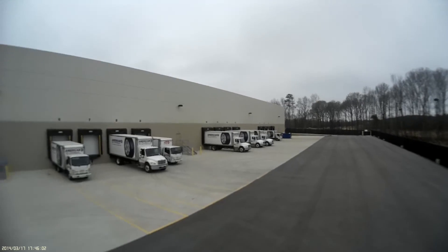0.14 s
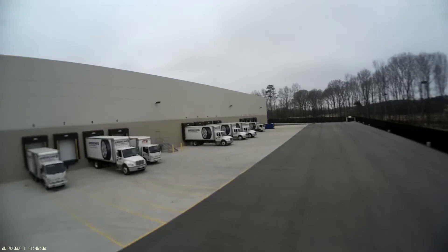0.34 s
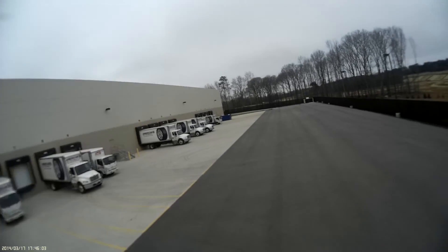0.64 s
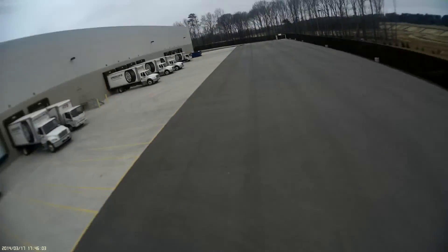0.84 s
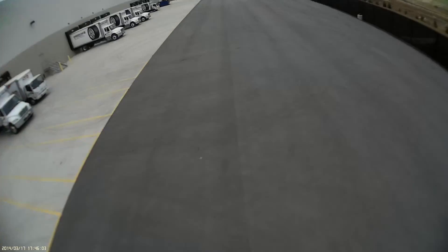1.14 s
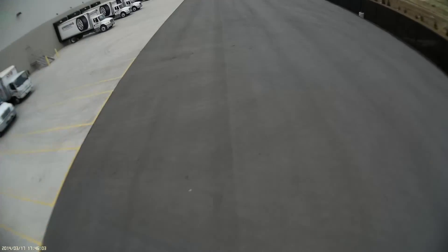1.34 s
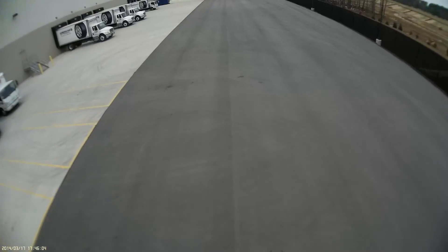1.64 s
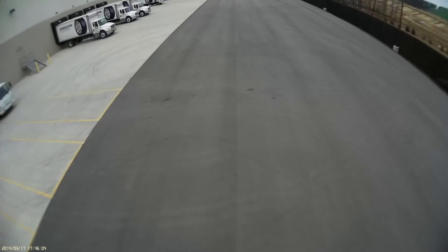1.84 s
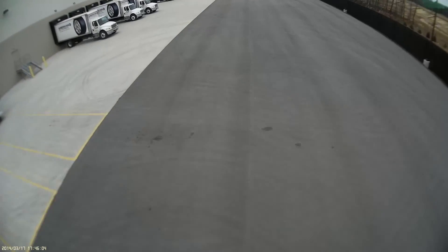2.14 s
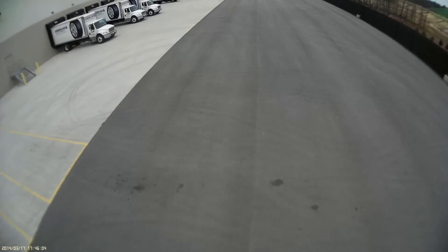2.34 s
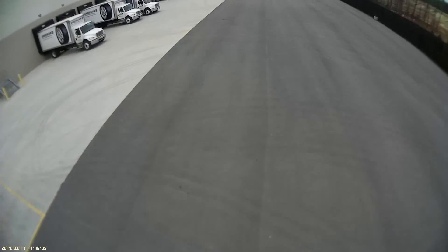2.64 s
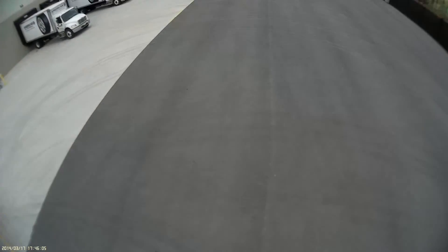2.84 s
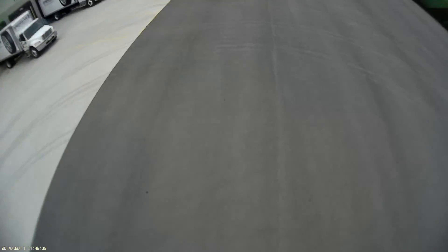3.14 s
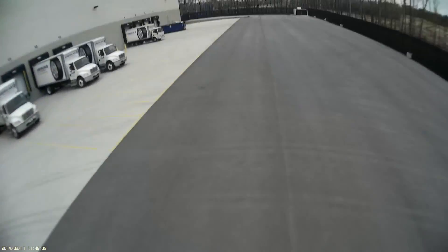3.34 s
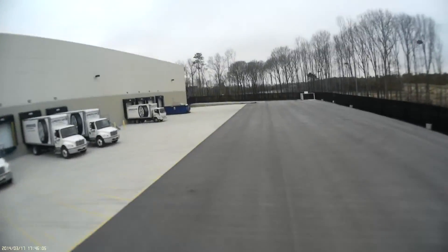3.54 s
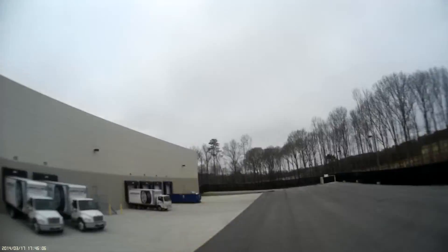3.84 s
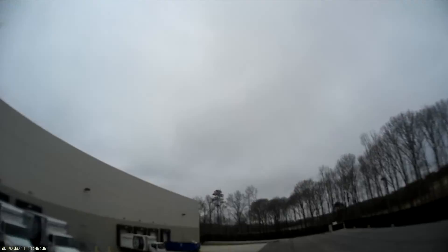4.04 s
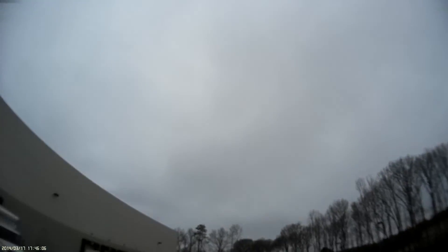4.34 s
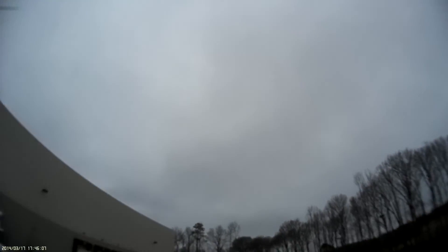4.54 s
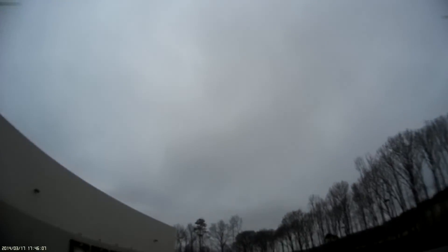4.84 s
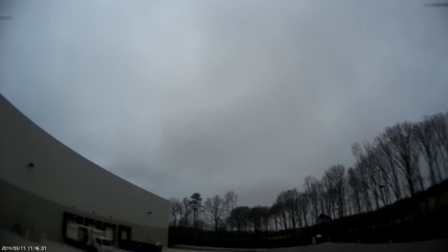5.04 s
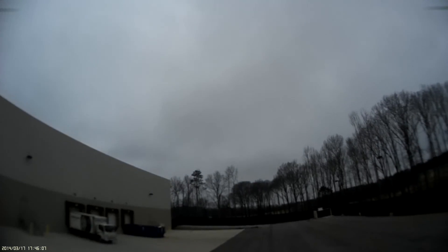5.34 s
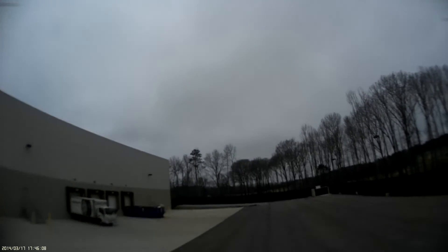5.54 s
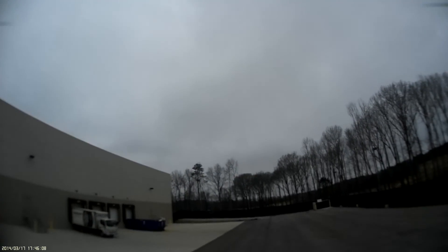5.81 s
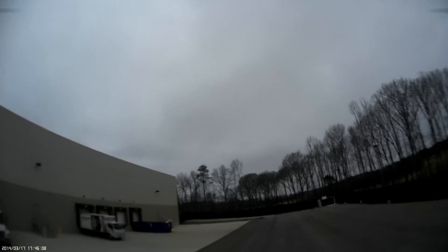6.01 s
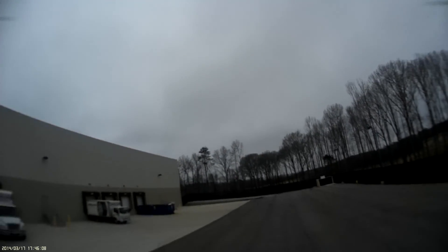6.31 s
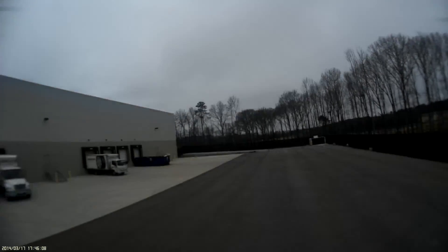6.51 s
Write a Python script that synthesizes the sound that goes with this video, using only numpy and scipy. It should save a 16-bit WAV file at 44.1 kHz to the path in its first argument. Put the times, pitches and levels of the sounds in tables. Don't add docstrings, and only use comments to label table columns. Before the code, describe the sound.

Microphone riding on a small drone outdoors over a paved lot: low propeller drone beating between rotors, with wind rumble and airy wash. Speed rises and high motor whines emerge over a calmer stretch, pitch peaks, then plunges as throttle drops. The rotors surge back with heavy buffeting and clipped distortion, settle into whining flight, and end in a gust.

```python
import sys
import numpy as np
from scipy import signal
from scipy.io import wavfile
from scipy.ndimage import uniform_filter1d

SR = 44100
rng = np.random.default_rng(int(sys.argv[2]) if len(sys.argv) > 2 else 0)


def undo_db(level):
    steps = np.asarray(level, float) / 20
    return 10 ** steps


def log_audio(samples):
    frames = np.atleast_2d(samples).T
    limited = np.clip(frames, -1, 1)
    pcm = np.round(limited * 32767).astype(np.int16)
    wavfile.write(sys.argv[1], SR, pcm)


N = 294141

# time in seconds, left and right chop depth from 0 to 1,
# left blade slap in dB.
INFLOW = [(0, 0.45, 0, -34), (.55, 0.53, 0.2, -38), (.68, 0.24, 0.27, -29), (.82, 0.42, 0.34, -35),
          (.95, 0.2, 0.4, -43), (1.5, 0.2, 0, -55), (3.3, 0.02, 0.23, -49.5), (4.1, 0.28, 0, -42),
          (4.6, 0.07, 0.21, -40), (5.5, 0, 0.27, -84), (6.1, 0, 0.68, -63), (6.67, 0, 0.64, -46)]


def in_time(rows):
    s, *columns = np.transpose(rows)
    return [np.interp(np.arange(N) / SR, s, column) for column in columns]


def turn(rate_hz):
    return 2 * np.pi * np.cumsum(rate_hz) / SR


def tone(level_db, angle):
    return np.sqrt(2) * undo_db(level_db) * np.cos(angle)


def drift(rate_hz, shape=np.positive):
    step = 32
    pole = np.exp(-2 * np.pi * step * rate_hz / SR)
    white = rng.standard_normal(N // step + 1002)
    slow = signal.lfilter([1], [1, -2 * pole, pole * pole], white)[1000:]
    return np.interp(np.arange(N) / step, np.arange(len(slow)), shape(slow / slow.std()))


def plateau(start, end, edge):
    t = np.arange(N) / SR
    return np.clip(np.minimum(t - start, end - t) / edge + .5, 0, 1)


def band_pass(x, order, low_hz, high_hz):
    return signal.sosfilt(signal.butter(order, [low_hz, high_hz], "band", fs=SR, output="sos"), x)


def speeds():
    # time in seconds, blade rate in Hz.
    left_course = [(0.0, 199.15), (0.49, 217.11), (0.73, 176.65), (1.01, 201.7), (1.6, 195.18),
                   (2.43, 222.22), (2.72, 210.75), (2.88, 232.39), (3.29, 234.69), (3.46, 175.66),
                   (3.6, 185.68), (3.71, 133.07), (4.02, 132.5), (4.82, 222.7), (4.94, 220.7),
                   (5.19, 224.32), (5.62, 217.05), (6.67, 238.54)]
    right_course = [(0.0, 147.76), (0.47, 165.82), (0.6, 161.31), (1.0, 232.66), (1.4, 241.0),
                    (1.64, 229.59), (2.05, 233.16), (2.75, 224.43), (2.92, 249.09), (3.02, 238.69),
                    (3.27, 257.07), (3.48, 199.53), (3.58, 211.38), (3.77, 142.17), (4.0, 136.83),
                    (4.35, 209.11), (4.93, 250.77), (6.67, 253.43)]
    rear_course = [(.84, 209.5), (.94, 222), (1.54, 211.3), (2.1, 241.6), (2.77, 249.3), (2.88, 262.3),
                   (3.3, 238.5), (3.48, 221), (3.58, 226), (3.68, 212), (4.0, 136), (4.34, 245.7),
                   (5.07, 249.6), (5.21, 238.6), (5.61, 228.2), (5.92, 234), (6.07, 224.2), (6.67, 240)]
    # time in seconds, left, right and rear kick in Hz.
    trims = [(0.12, 10.37, 2.21, 0.06), (0.2, 14.13, 6.25, 0.04), (0.27, 7.74, 3.96, 0.05),
             (0.74, 6.7, 8.82, 0.45), (0.98, 11.65, 5.21, 1.35), (1.19, -10.41, -4.17, -1.79),
             (1.51, -10.9, -6.27, 0.6), (1.58, -15.43, -7.95, -0.06), (1.7, -6.59, -1.69, -2.66),
             (1.8, -4.25, 0.32, -0.51), (2.28, -6.08, -4.26, -1.16), (2.35, -8.12, -0.16, 2.0),
             (2.44, -7.6, 4.4, 2.32), (2.95, 4.53, -4.88, -2.31), (3.17, 10.48, 7.99, 0.27),
             (3.61, -4.2, 2.27, 3.0), (3.99, -17.1, 2.52, 9.13), (4.14, 5.53, -1.84, -0.13),
             (4.19, 10.9, -1.19, 1.09), (4.33, -14.7, -12.72, -0.15), (4.45, 8.05, 8.74, -1.43),
             (4.51, -4.88, 2.59, -0.64), (4.58, -10.08, -3.03, -0.82), (4.93, -19.81, -15.68, 0.26),
             (5.02, -6.62, -3.99, 0.86), (5.42, -6.59, -2.78, 4.32), (5.57, 3.36, 2.81, -3.88),
             (6.02, 6.0, 0.85, 0.13), (6.08, 8.53, -1.41, -2.49), (6.44, -3.34, -3.22, 0.08)]
    trim_s, inertia_s = .07, .035
    t = np.arange(N) / SR
    rates_hz = np.array(in_time(left_course) + in_time(right_course) + in_time(rear_course))
    for s, *kicks_hz in trims:
        kick = np.clip(1 - np.abs(t - s) / trim_s, 0, 1)
        rates_hz = rates_hz + np.outer(kicks_hz, kick)
    return uniform_filter1d(rates_hz, int(inertia_s * SR), axis=1, mode="nearest")


def propellers(left, right, rear):
    # time in seconds, left and right thump in dB.
    loading = [(0.0, -8, -18.5), (0.6, -7.8, -19), (1.0, -9.5, -14.5), (1.3, -11.5, -15.5), (1.5, -13, -17),
               (2.1, -11, -18), (2.67, -12.5, -19), (3.33, -13, -17.5), (3.5, -12.5, -12.5),
               (3.67, -11.5, -17), (3.84, -20.5, -18.5), (4.17, -12, -15), (4.4, -11.5, -9),
               (4.67, -9, -12), (4.84, -8, -7), (5.1, -9.8, -13.5), (6.2, -11.5, -15.5),
               (6.67, -6.5, -12.5)]
    # multiple of the blade rate,
    # left level in dB, left lag in radians, right level in dB, right lag in radians.
    blade_pulse = [
        (1, -0.5, 0, 3, -0.16),
        (2, -10, 1.0, -8.5, -0.48),
        (3, -18.5, 2.0, -17.5, 0.52),
        (4, -27.5, 3, -35, 1.4),
        (5, -32.5, 5, -32, -0.44),
    ]
    # time in seconds, left and right level in dB.
    imbalance = [(0, -53, -32), (.9, -51, -27.5), (3.3, -45, -32.5), (3.8, -48, -36), (4.4, -66, -26),
                 (5.1, -22.5, -24.5), (5.9, -30, -29.5), (6.67, -38, -26)]
    wake_db, wake_third_db, far_thump_db = -5.5, -11.5, -35.5
    left_db, right_db = in_time(loading)
    wobble_left_db, wobble_right_db = in_time(imbalance)

    out = tone(wobble_left_db + 2.7 * drift(3.5), left / 2 - 1.4)
    out += tone(wobble_right_db + 1.8 * drift(7.1), right / 2 + 0.39)
    out += tone(wobble_left_db * 0.3 - 27 + 2 * drift(5), left * 3 / 2 - 2.6)
    out += tone(wobble_left_db * 0.1 - 30 + 3 * drift(4), left * 5 / 2 + 2.4)
    out += tone(right_db - 24 + 3 * drift(6), right * 3 / 2 - .8)
    out += tone(left_db - 28 + 0.91 * drift(12), left * 3 / 2 + right + 2.6)

    for k, (_, left_part_db, left_lag, right_part_db, right_lag) in enumerate(blade_pulse):
        unrest_db = 0.87 * k
        stiff = k / (k + 1.6)
        left_level_db = left_db + left_part_db - stiff * (left_db + 11.0)
        right_level_db = right_db + right_part_db - stiff * (right_db + 14.0)
        out += tone(left_level_db + unrest_db * drift(8), (k + 1) * left - left_lag)
        out += tone(right_level_db + unrest_db * drift(10), (k + 1) * right - right_lag)

    slap_db = in_time(INFLOW)[2]
    for k in range(5, 11):
        crack_db = slap_db + 1 - .9 * (k - 6.2) ** 2
        out += tone(crack_db + 1.5 * drift(8), k * (left - 1.9) - .4)

    out += tone(left_db + right_db + wake_db + 1.5 * drift(5), left + right + 2.4)
    out += tone(2 * left_db + right_db + wake_third_db + 2.2 * drift(5.9), 2 * left + right + 2.54)
    out += tone(far_thump_db + 5.1 * drift(25.0), rear)
    return out + tone(far_thump_db - 22.0 + 1.9 * drift(8.6), 2 * rear)


def air_levels(rear_hz):
    # time in seconds, crosswind and wake turbulence in dB.
    wind_course = [(0.0, -19.5, -29.5), (0.55, -29, -32), (0.87, -28.5, -34), (0.97, -35, -41),
                   (1.2, -51, -44), (2.0, -33.5, -42.5), (2.85, -31, -38.5), (3.15, -28, -38.5),
                   (3.42, -30, -34.5), (3.74, -32, -40), (3.95, -35, -41), (4.4, -23.5, -29.5),
                   (4.7, -18, -26.5), (4.94, -16, -27), (5.02, -33, -35.5), (5.4, -39, -41.5),
                   (5.96, -32.5, -38.5), (6.67, -21.5, -24)]
    # start and length in seconds, crosswind and wake lift in dB.
    gusts = [
        (-.1, .14, 3, -0.5),
        (3.22, 0.14, -8, 3),
        (3.489, 0.21, 5, 5),
        (4.805, 0.11, 2.5, 3.5),
        (5.997, 0.087, -1, 5.5),
        (6.054, 0.12, 0, 1),
        (6.28, 0.11, 0.5, 2.5),
        (6.306, 0.26, 2, 2),
        (6.629, .1, 10, 2),
    ]
    # start and end in
    # seconds, lift in dB.
    bright_tips = [
        (.9, 2.913, 7.5),
        (3.224, 3.398, 9),
        (4.37, 4.47, 11),
        (4.7, 4.92, 12),
        (5.0, 5.6, 7),
        (6.6, 6.7, 15),
    ]
    wind_db, calm_db = in_time(wind_course)
    wake_db = calm_db
    for start, length, wind_lift_db, wake_lift_db in gusts:
        on = plateau(start, start + length, .035)
        wind_db = wind_db + wind_lift_db * on
        wake_db = wake_db + wake_lift_db * on
    wind, wake = wind_db + 33, wake_db + 36

    buffet_db = -36 + 1.4 * wind
    rush_db = -28 + 0.31 * wind + 0.59 * wake
    speed_db = 20 * np.log10(rear_hz / rear_hz.mean())
    sizzle_db = -50.5 + 1.3 * speed_db + 0.05 * wind - 0.14 * wake
    sizzle_db = sizzle_db + 0.27 * (wake_db - calm_db)
    for start, end, lift_db in bright_tips:
        sizzle_db = sizzle_db + lift_db * plateau(start, end, .09)
    return buffet_db, rush_db, wake_db, sizzle_db


def eddies(spectrum, shared_db, own_db, own_hz, lo_hz, hi_hz):
    hz, level_db = np.transpose(spectrum)
    edges = hz[0] * 2 ** np.arange(-.5, np.log2(hz[-1] / hz[0]) + .5, .5)
    white = rng.standard_normal((2, N))
    out = 0
    for k, (low, high) in enumerate(zip(edges, np.minimum(edges[1:], .45 * SR))):
        centre_db = np.interp(np.log(low * high) / 2, np.log(hz), level_db)
        flicker = drift(own_hz, lambda chance: undo_db(centre_db + own_db * chance))
        out = out + band_pass(white[k % 2], 2, low, high) * flicker
    return out * undo_db(shared_db) / band_pass(out, 4, lo_hz, hi_hz).std()


def housing(x):
    # resonance in Hz, width in Hz, lift in dB.
    cavities = [(3680, 280, 6.5), (4900, 170, 3), (7190, 430, 4), (9780, 750, 7), (11800, 380, 4.5),
                (13600, 700, 1)]
    for hz, width, lift_db in cavities:
        r = np.exp(-np.pi * width / SR)
        zeros = (1 - r * r) / 2 * np.array([1, 0, -1])
        poles = [1, -2 * r * np.cos(2 * np.pi * hz / SR), r * r]
        x = x + (undo_db(lift_db) - 1) * signal.lfilter(zeros, poles, x)
    return x


def airflow(left, right, rear, levels_db):
    # frequency in Hz, density in dB per Hz.
    buffet_spectrum = [(20, -5), (50, -5), (100, -7), (200, -11.5), (400, -16), (800, -26)]
    wash_spectrum = [(120, -2), (250, 1.5), (450, -2), (700, -3.5), (1000, -15)]
    rush_spectrum = [(300, -2), (600, 3), (900, 1), (1300, 2.5), (1700, 8), (2200, -23), (3000, -10.5),
                     (5000, -33)]
    hiss_spectrum = [(1500, -46), (2400, 0), (3300, -3), (5500, 2.5), (7500, -8.5), (10000, -13.5),
                     (13000, -21)]
    sizzle_spectrum = [(5000, -10), (7500, 1), (10000, -15), (12500, -4.5), (14500, -9), (16000, -13)]
    buffet_db, rush_db, hiss_db, sizzle_db = levels_db
    left_depth, right_depth, _ = in_time(INFLOW)
    roughness_db = np.clip(2.0 + 0.052 * (hiss_db + 35), 0, 5)
    gust = roughness_db * (0.47 * drift(34) + 0.38 * drift(180))
    chop = 1 + np.clip(left_depth, 0, .7) * np.cos(left - 1.6)
    chop += np.clip(right_depth, 0, .7) * np.cos(right - 1.4)
    tip_chop = 1 + 0.46 * np.cos(rear)

    buffet = undo_db(buffet_db) * eddies(buffet_spectrum, 1.1 * gust, 2.8, 3.75, 18.6, 100)
    wash_db = -27.5 + 0.25 * (rush_db + 19.5)
    wash = undo_db(wash_db) * eddies(wash_spectrum, .5 * gust, 0.3, 8.4, 244, 1030)
    rush = undo_db(rush_db - 1.5) * chop * eddies(rush_spectrum, 0.74 * gust, 1.06, 34, 770, 2950)
    hiss = undo_db(hiss_db - 2.0) * chop * eddies(hiss_spectrum, 0.41 * gust, 0.97, 36, 1740, 4730)
    sizzle = eddies(sizzle_spectrum, 0.55 * gust, 1.3, 70, 10100, 16600)
    sizzle = undo_db(sizzle_db - 3.5) * tip_chop * sizzle
    return buffet + wash + rush + housing(hiss + sizzle)


def whine(angle, strands):
    mute_db = -78
    angle = angle + turn(.2 * drift(25) + .35 * drift(6))
    out = 0
    for on, k, db in strands:
        level_db = mute_db + (db - mute_db) * on
        out = out + tone(level_db + 2.0 * drift(20) + 1.0 * drift(5), k * angle)
    return out


def motors(left, right, rear):
    # start and end in seconds, multiple of the blade rate, level in dB.
    left_strands = [
        (1.7, 2.8, 21, -54),
        (2.78, 3.38, 21, -46),
        (2.78, 3.38, 28, -51),
        (2.8, 3.1, 26, -52),
    ]
    right_strands = [
        (.9, 2.9, 21, -58),
        (1.25, 1.47, 21, -48),
        (3.05, 3.3, 21, -45),
        (.89, 3.13, 26, -44),
        (.89, 3.13, 28, -48),
        (.89, 3.16, 42, -52),
        (4.95, 6.15, 21, -46),
        (4.95, 6.45, 28, -51),
        (4.93, 6.5, 42, -54),
    ]
    rear_strands = [(.78, 1.7, 21, -44.5), (1.66, 2.14, 21, -42), (2.1, 3.14, 21, -45),
                    (3.28, 3.68, 21, -41), (4.22, 4.35, 21, -40), (4.99, 6.32, 21, -42.5),
                    (2.0, 3.3, 28, -45), (5.05, 5.45, 28, -49), (.8, 1.3, 42, -56), (1.75, 2.2, 42, -56),
                    (3.28, 3.6, 42, -53), (5.45, 6.0, 42, -54)]
    # time in seconds, blade rate in Hz, whine in dB.
    fourth_course = [
        (.9, 246, -75),
        (1.05, 255, -48),
        (1.17, 250, -49),
        (1.35, 255.5, -47),
        (1.45, 251, -49),
        (1.58, 243, -75),
    ]
    fade_s = .05
    fourth_hz, fourth_db = in_time(fourth_course)
    out = whine(turn(fourth_hz), [(1, 21, fourth_db)])
    for angle, rows in ((right, right_strands), (rear, rear_strands), (left, left_strands)):
        strands = [(plateau(start, end, fade_s), k, db) for start, end, k, db in rows]
        out += whine(angle, strands)
    return out


def buzz():
    # start and end in seconds, centre in Hz, width in Hz, level in dB.
    frame_mode = (3.23, 3.38, 2200, 150, -36)
    start, end, hz, width, level_db = frame_mode
    ringing = band_pass(rng.standard_normal(N), 2, hz - width / 2, hz + width / 2)
    envelope = in_time([(start - .015, 0), (start + 0.014, 1), (end - .015, 1), (end + 0.017, 0)])[0]
    return undo_db(level_db) * ringing / ringing.std() * envelope


def scene():
    start_angles = (-2.2, -1.33)
    left_hz, right_hz, rear_hz = speeds()
    left = turn(left_hz) + start_angles[0]
    right = turn(right_hz) + start_angles[1]
    rear = turn(rear_hz)
    thump = propellers(left, right, rear)
    air = airflow(left, right, rear, air_levels(rear_hz))
    return (thump + air + motors(left, right, rear) + buzz())[None]


def low_pass(x):
    return signal.sosfilt(signal.butter(12, 15670, fs=SR, output="sos"), x)


def record(dry):
    overload = .708
    mix = np.clip(dry + 0.0015, -overload, overload)
    return low_pass(mix)


dry = scene()
out = record(dry)
log_audio(out)
```